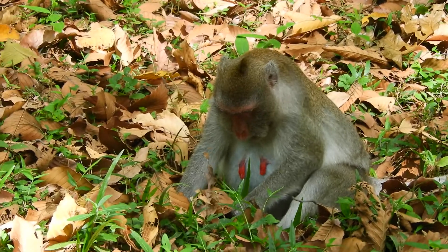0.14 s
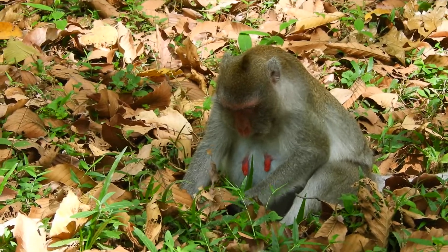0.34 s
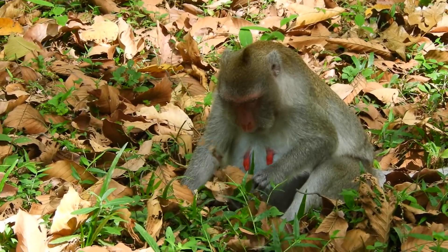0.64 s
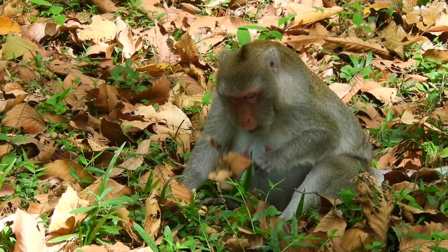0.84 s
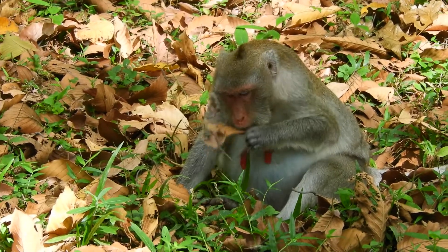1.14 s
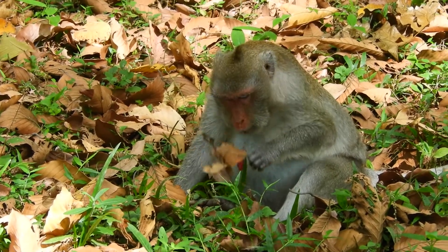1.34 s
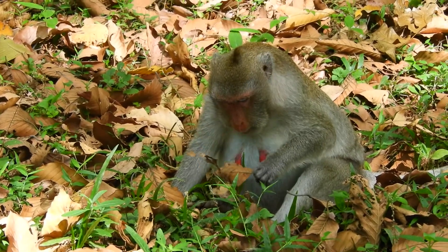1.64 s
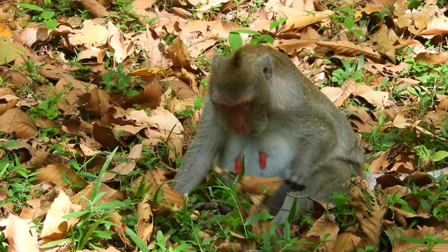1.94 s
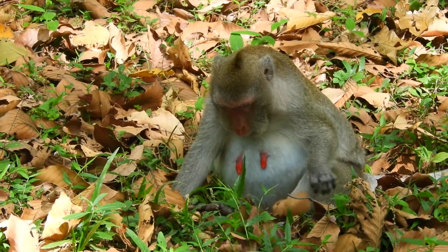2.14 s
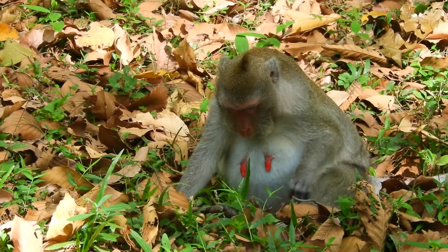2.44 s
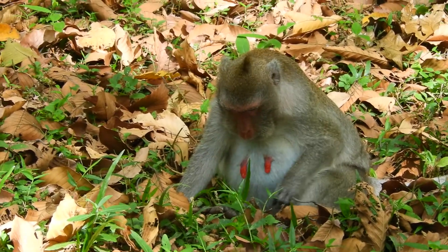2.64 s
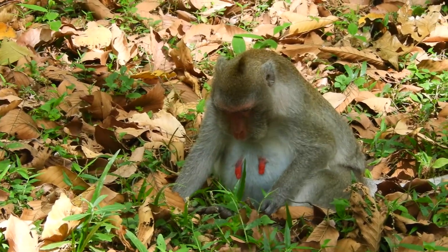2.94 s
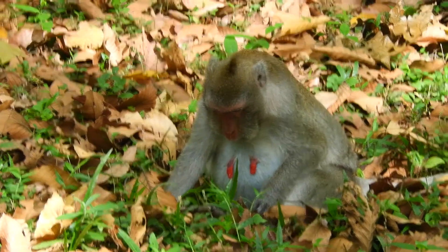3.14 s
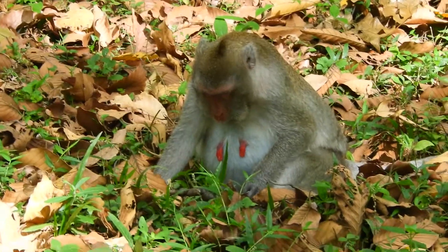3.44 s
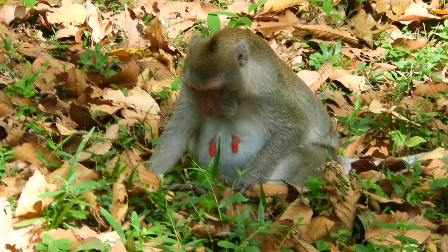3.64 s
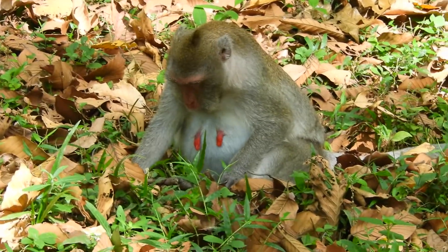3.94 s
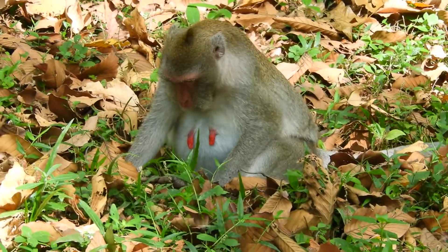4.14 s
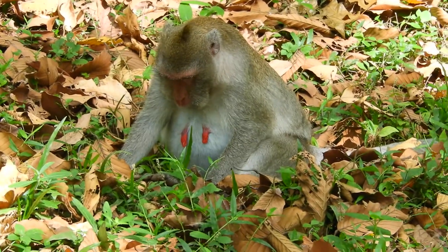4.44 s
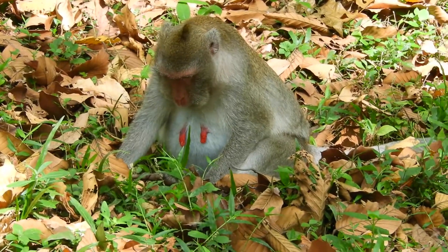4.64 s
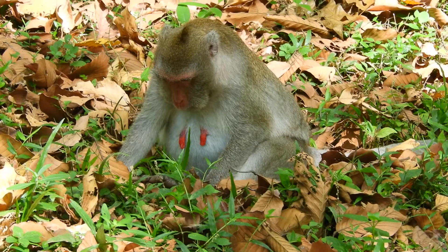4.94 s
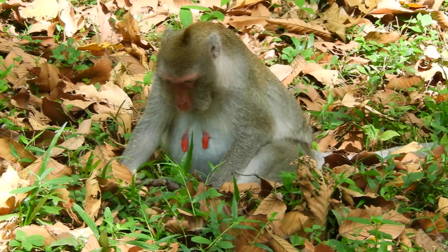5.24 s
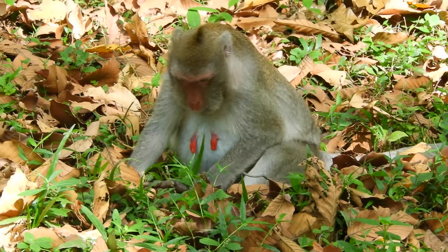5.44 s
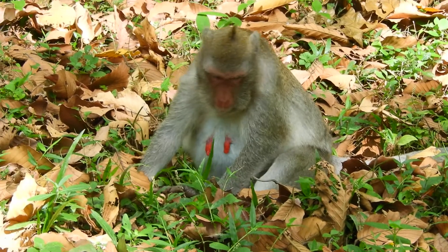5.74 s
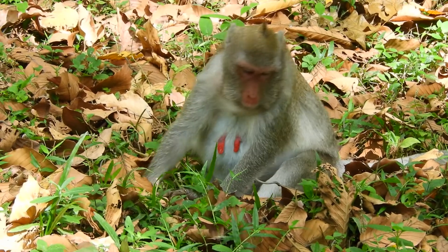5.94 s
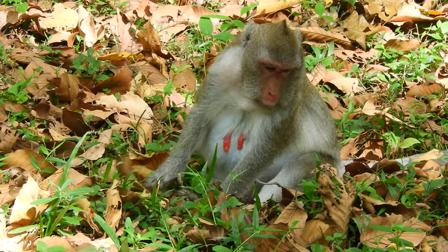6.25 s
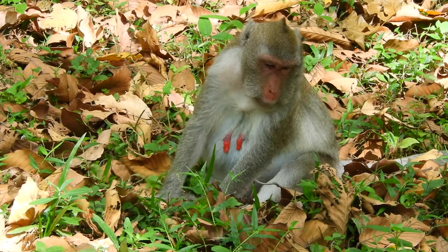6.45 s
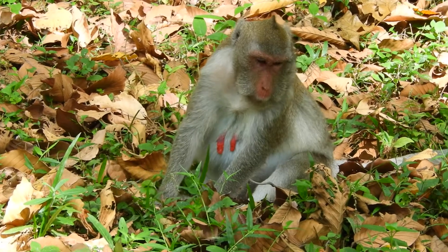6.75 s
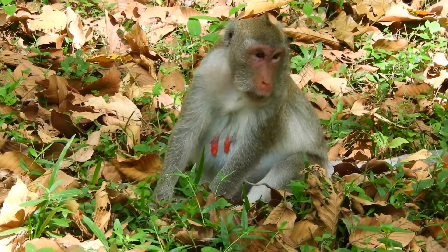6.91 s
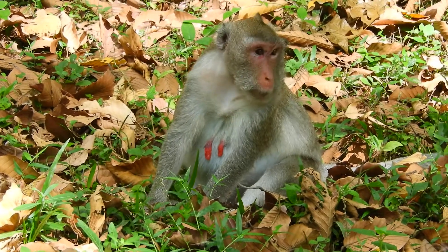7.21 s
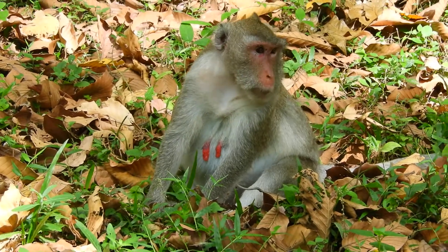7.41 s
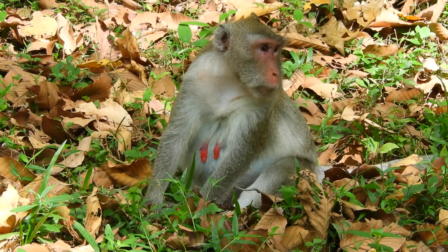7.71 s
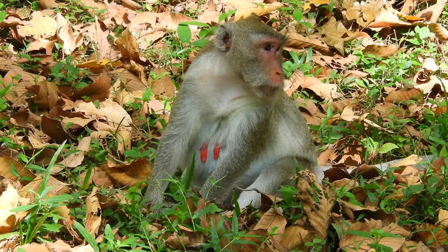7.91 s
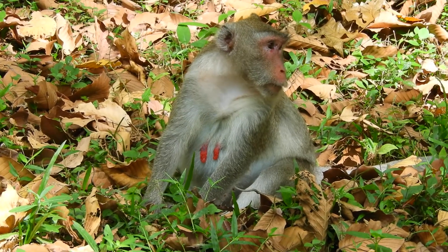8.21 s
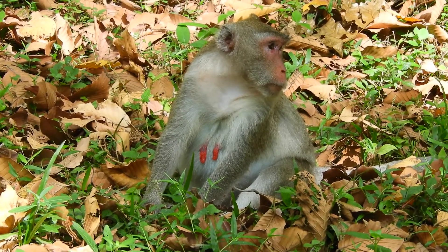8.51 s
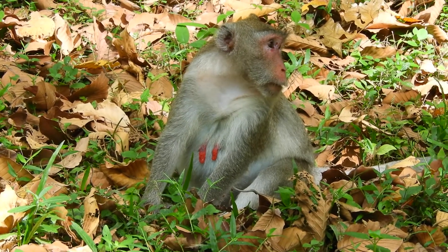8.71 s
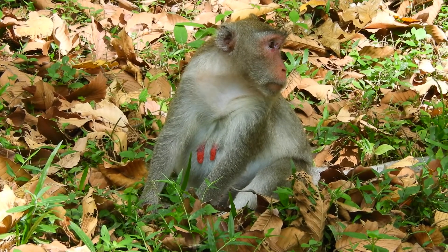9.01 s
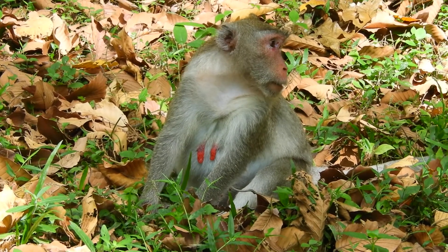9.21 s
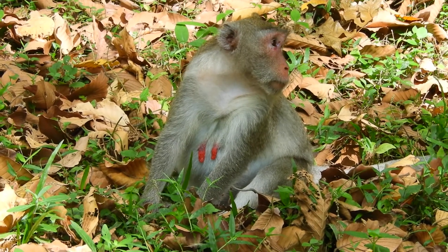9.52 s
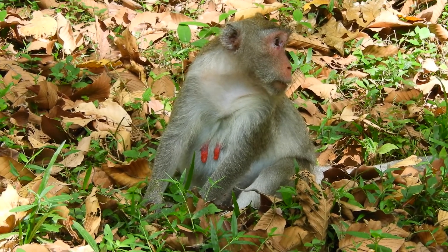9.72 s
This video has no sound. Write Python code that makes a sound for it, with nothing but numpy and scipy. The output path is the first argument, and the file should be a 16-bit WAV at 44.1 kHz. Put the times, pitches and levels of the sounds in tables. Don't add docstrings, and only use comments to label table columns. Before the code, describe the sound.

Continuous high buzzing cicada drone in reverberant woodland, low motor hum and far road rumble beneath, a soft bird whistle and small dry clicks.

```python
import sys
import numpy as np
from scipy import signal
from scipy.fft import rfft, irfft
from scipy.io import wavfile
from scipy.ndimage import uniform_filter1d

SR = 44100
rng = np.random.default_rng(int(sys.argv[2]) if len(sys.argv) > 2 else 0)


def transcribe(u):
    v = np.clip(np.atleast_2d(u).T, -1, 1)
    q = np.round(v * 32767).astype(np.int16)
    wavfile.write(sys.argv[1], SR, q)


def voltage_ratio(decibels):
    exponent = np.asarray(decibels, float) / 20
    return 10 ** exponent


N = 435266
T = np.arange(N) / SR


def drift(rate, count=1):
    knots = rng.standard_normal((count, 3000))
    return np.array([np.interp(T * rate, np.arange(k.size), k) for k in knots]) * np.sqrt(1.5)


def hiss(spectrum, patchy_db, size=1024):
    # f/Hz, coherence
    likeness = [(60, 1), (200, 0.91), (500, 0.32), (1000, 0.73), (2200, 0.44), (3400, 0.4), (4200, 0.55),
                (6000, 0.47), (7000, 0.16), (11000, 0.02)]
    frames = 4 * N // size + 5
    log_hz = np.log(np.fft.rfftfreq(size, 1 / SR) + 1)

    def over_bins(rows):
        hz, values = np.transpose(rows)
        return np.interp(log_hz, np.log(hz), values)[:, None]

    a, b, c, d, patches = rng.standard_normal((frames, size // 2 + 1, 5)).T
    patches = uniform_filter1d(patches, size=12, axis=0)
    patches = uniform_filter1d(patches, size=14, axis=1)
    same = np.clip(over_bins(likeness), 0, 1)
    left = a + 1j * b
    right = same * left + np.sqrt(1 - same ** 2) * (c + 1j * d)
    bins = np.array([left, right]) * voltage_ratio(over_bins(spectrum) + patchy_db * patches / patches.std())
    noise = signal.istft(bins, nperseg=size, noverlap=3 * size // 4)[1][:, :N]
    return noise / np.sqrt(np.mean(noise ** 2, -1, keepdims=True) + 1e-20)


def trees(x, t60=0.93, apart_hz=6500):
    t = np.arange(SR) / SR
    shared, *own = rfft(rng.standard_normal((3, SR)) * voltage_ratio(-60 * t / t60))
    alike = 0.93 / (1 + (np.arange(len(shared)) / apart_hz) ** 4)
    tail = irfft(np.sqrt(alike) * shared + np.sqrt(1 - alike) * np.array(own))
    return signal.fftconvolve(x[None], tail / np.linalg.norm(tail[0]), axes=1)[:, :N]


def hum(hz, unsteady_hz, flutter_db):
    pitch, strength = drift(12, count=2)
    phase = 2 * np.pi * np.cumsum(hz + unsteady_hz * pitch) / SR
    return np.sqrt(2) * np.cos(phase) * voltage_ratio(flutter_db * strength)


def cicadas(count=20, throb=0.64, spread_s=3.5e-5, wet_db=-4):
    # harmonic, level/dB, left-right/dB, right port lag/rad, loudest body f/Hz,
    # fall-off under it/dB per 100 Hz
    song = [(1, -33, -2.5, -0.5, 2621, 8), (2, -26.5, -1, 0.53, 2617, 10), (3, -25.5, 0, -1.51, 2597, 19),
            (4, -43, 0, -1.9, 2520, 33)]
    top_hz, low_hz = 2712.4, 2389.4
    waver_depth, buckles_per_s = .008, 120
    turn_db_per_s, turn_hz = 0.52, 2640
    out = np.zeros((2, N))
    for body_hz in top_hz - (top_hz - low_hz) * np.linspace(0, 1, count) ** 1.3:
        waver, pace, swell, wander = drift(140)[0], drift(20)[0], drift(16)[0], drift(1.5)[0]
        pitch_hz = body_hz * (1 + waver_depth * waver + .004 * wander)
        carrier = np.exp(2j * np.pi * np.cumsum(pitch_hz) / SR).astype(np.complex64)
        rate = buckles_per_s * rng.uniform(0.98, 1.04) * (1 + 0.04984 * pace)
        burst = np.cumsum(rate) / SR + rng.random()
        trend_db = turn_db_per_s * (T - 5) * np.tanh((body_hz - turn_hz) / 30)
        partial = (1 + throb * np.cos(2 * np.pi * burst)) * voltage_ratio(2.07 * swell + trend_db)
        partial = partial.astype(np.complex64)
        delay = spread_s * rng.standard_normal()
        for order, db, pan_db, lag, best_hz, fall_db in song:
            partial = partial * carrier
            gain = voltage_ratio(db - fall_db * max(best_hz - body_hz, 0) / 100)
            tone = partial * complex(gain * np.exp(2j * np.pi * rng.random()))
            shift = np.exp(1j * lag - 2j * np.pi * order * body_hz * delay)
            out[0] += tone.real * voltage_ratio(pan_db / 2)
            out[1] += (tone * complex(shift)).real * voltage_ratio(-pan_db / 2)
    out *= voltage_ratio(0.06 * drift(4.6)[0]) / np.sqrt(count)
    return voltage_ratio(0.5) * out + voltage_ratio(wet_db) * trees(out.mean(0))


def insect_haze():
    # f/Hz, level/dB per Hz
    haze = [(300, 4.5), (1000, -7), (1800, -4), (2400, 1.5), (3200, 1.5), (4000, -13.5), (4600, 0),
            (5800, 9), (6800, 2.5), (7400, 8), (8700, 11), (9800, 2), (10900, -3), (11100, -60)]
    return voltage_ratio(-35) * hiss(haze, patchy_db=1.95)


def vehicle():
    # t/s, firing rate f/Hz, nearness/dB, throttle/dB
    drive = [(0.0, 30.0, -57, -21), (1.3, 31, -52.5, -4.5), (2.5, 32.53, -52.5, 6), (3.7, 34.75, -51, 2.5),
             (4.7, 36.1, -50.5, -1.5), (5.9, 37.23, -49, 5.5), (7.2, 38.24, -48.5, 2.5),
             (7.6, 39, -48.5, 3.5), (7.85, 39.18, -47.5, 11), (8.5, 39.07, -46, 4), (9.2, 38.44, -43.5, 1),
             (9.87, 38.73, -46, 3)]
    orders = [(3, 7), (4, 4.5), (5, 2), (6, -3.5), (7, -18), (8, -9), (9, -11.5), (10, -14.5)]
    # f/Hz, level/dB per Hz
    road = [(25, -38), (45, -10), (90, -9.5), (150, 6.5), (200, 0.5), (270, -13), (420, -18), (1000, -16),
            (2000, -22), (4000, -24.5), (7000, -29.5)]
    pipe_hz, pipe_width_hz, pipe_db = 186.5, 18, 10.5
    boom_db = 7.5
    far_dull = .18
    t, *columns = np.transpose(drive)
    firing_hz, near_db, throttle_db = [np.interp(T, t, column) for column in columns]
    notes = voltage_ratio(near_db + throttle_db + boom_db) * hum(2 * firing_hz, 0.37, 1.4)
    for k, db in orders:
        pipe = 1 / (1 + ((k * firing_hz - pipe_hz) / pipe_width_hz) ** 2)
        air_db = far_dull * max(k - 5, 0) * (near_db + 45.5)
        resonance_db = (pipe_db + 0.37 * (near_db + 48)) * pipe
        note = hum(k * firing_hz, 0.246 * k, 3.1 - 1.8 * pipe)
        notes += voltage_ratio(near_db + db + air_db + resonance_db) * note
    roar = voltage_ratio(1.36 * (near_db + 50) - 41.5) * hiss(road, patchy_db=2.4, size=2048)
    return notes * voltage_ratio([[-.7], [.6]]) + roar


def bird():
    falls = [
        (2.47, .14, 3400, 2950, -46.5),
        (3.65, .15, 3420, 3040, -44.5),
    ]
    rises = [
        (4.5, .09, 4240, 4420, -49),
        (4.745, .11, 3500, 4050, -52),
        (4.92, .105, 3950, 3900, -55),
        (5.095, .09, 4100, 4600, -51.5),
    ]
    out = whistles(falls, arch_hz=150, bend=2.2, under_db=-8)
    out = out + whistles(rises, arch_hz=39.6, bend=1.3, under_db=-24)
    return out + voltage_ratio(-3) * trees(out, t60=.25)


def whistles(rows, arch_hz, bend, under_db):
    out = np.zeros(N)
    for start, length, first_hz, last_hz, db in rows:
        u = np.arange(0, length, 1 / SR) / length
        hz = first_hz + (last_hz - first_hz) * u ** bend + arch_hz * np.sin(np.pi * u)
        phase = 2 * np.pi * np.cumsum(hz * (1 + .006 * drift(200)[0][:len(u)])) / SR
        envelope = voltage_ratio(2.2 * drift(90)[0][:len(u)]) * signal.windows.tukey(len(u), .3)
        voice = np.sin(phase) + voltage_ratio(under_db) * np.sin(phase / 2)
        out[round(start * SR):][:len(u)] += voltage_ratio(db) * envelope * voice
    return out


def leaves():
    # t/s, peak level/dB, f/Hz, width f/Hz
    ticks = [
        (5.982, -24, 2530, 1300),
        (5.992, -36, 4000, 2500),
        (7.187, -27, 8000, 2000),
        (7.204, -20, 6500, 4000),
        (7.235, -30, 8000, 3000),
    ]
    out = np.zeros(N)
    t = np.arange(-100, 100) / SR
    for s, db, hz, width_hz in ticks:
        ring = np.exp(-(2 * width_hz * t) ** 2) * np.sin(2 * np.pi * hz * t)
        out[round(s * SR) - 100:][:200] += voltage_ratio(db) * ring
    return out + voltage_ratio(-2) * trees(out, t60=.03)


def generator():
    # f/Hz, level/dB, unsteadiness f/Hz
    idle = [(52.15, -39, 0.15), (100.4, -52.5, 2.8), (103, -44.5, 1.62), (146.6, -50.5, 4.06)]
    # f/Hz, level/dB per Hz
    rumble = [(28, -40), (40, -14), (60, -3.5), (100, 3), (170, -1), (220, -12.5), (300, -36), (450, -41)]
    notes = sum(voltage_ratio(db) * hum(hz, unsteady, 0.18 + unsteady) for hz, db, unsteady in idle)
    far_road = voltage_ratio(-38) * hiss(rumble, patchy_db=3.0, size=4096)
    return (notes + far_road) * voltage_ratio([[-.7], [.6]])


def scene():
    return cicadas() + insect_haze() + vehicle() + bird() + leaves() + generator()


def top_cut(x):
    return signal.sosfilt(signal.butter(12, 11200, fs=SR, output="sos"), x)


def record(dry):
    return top_cut(dry - .0024)


dry = scene()
out = record(dry)
transcribe(out)
```